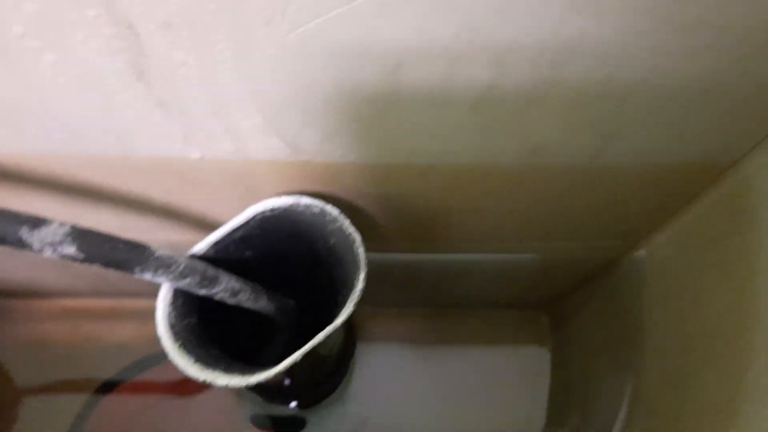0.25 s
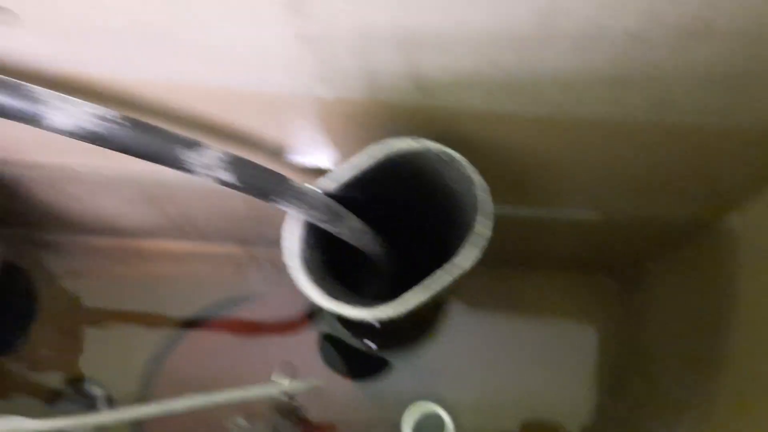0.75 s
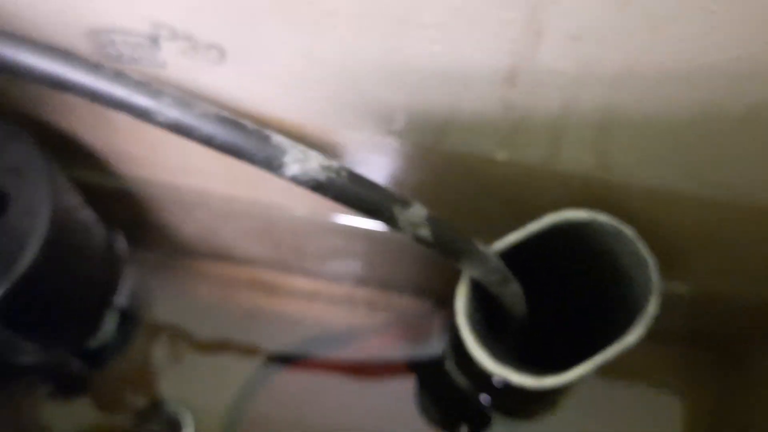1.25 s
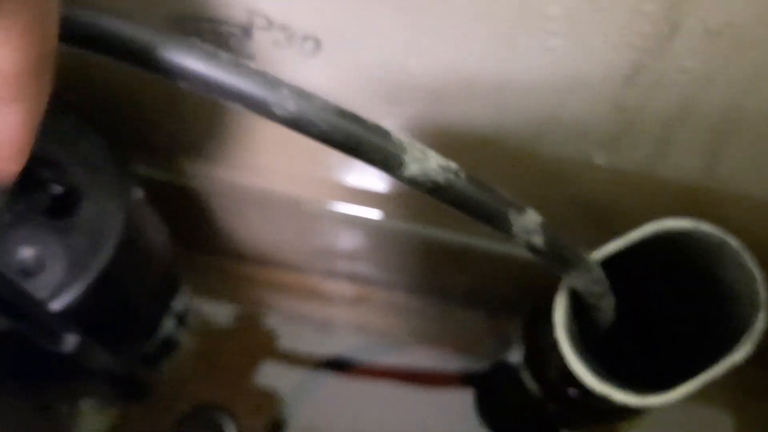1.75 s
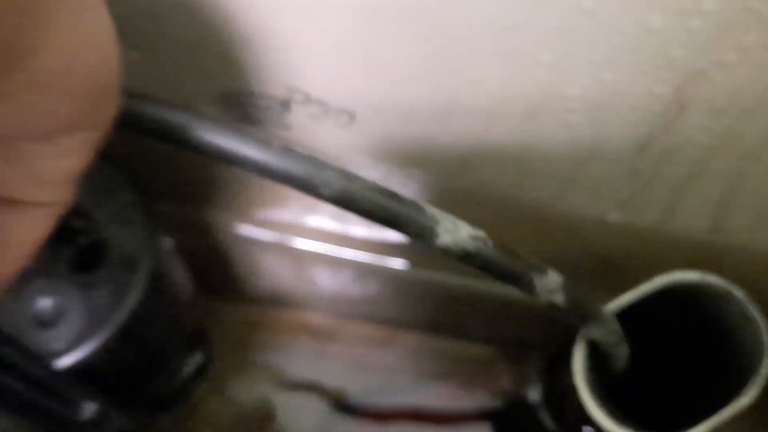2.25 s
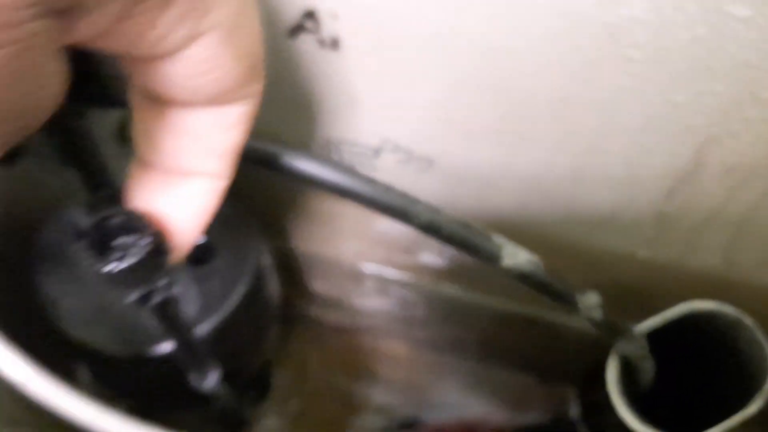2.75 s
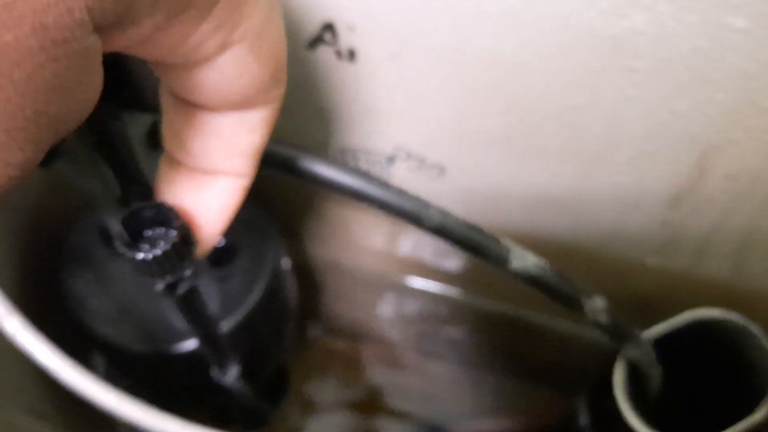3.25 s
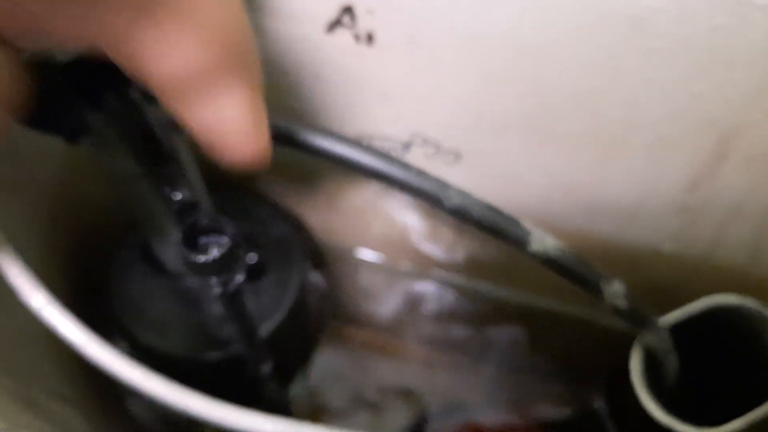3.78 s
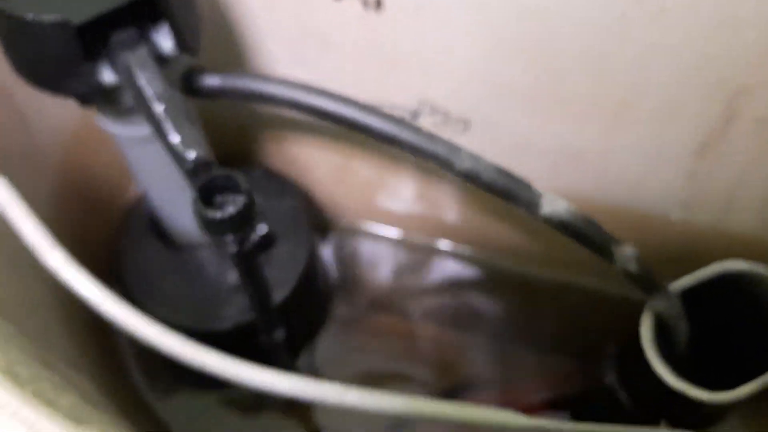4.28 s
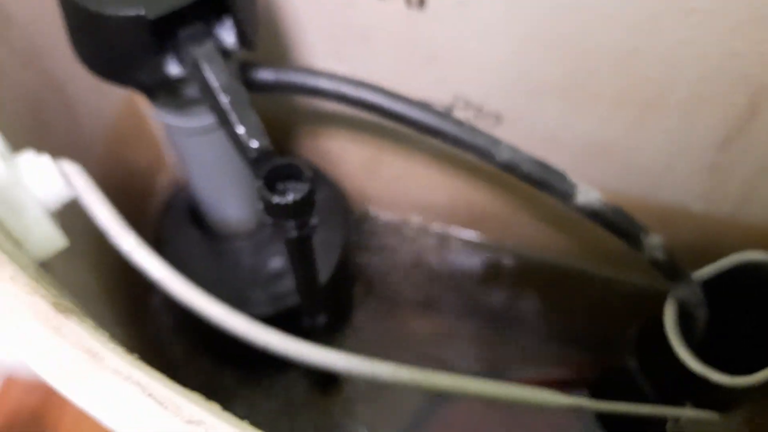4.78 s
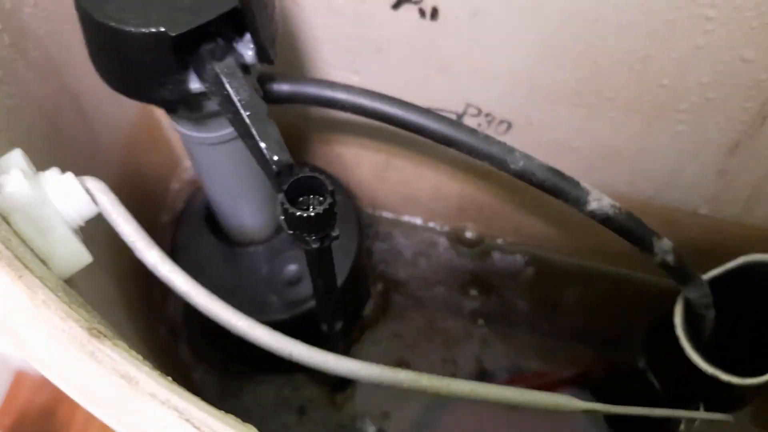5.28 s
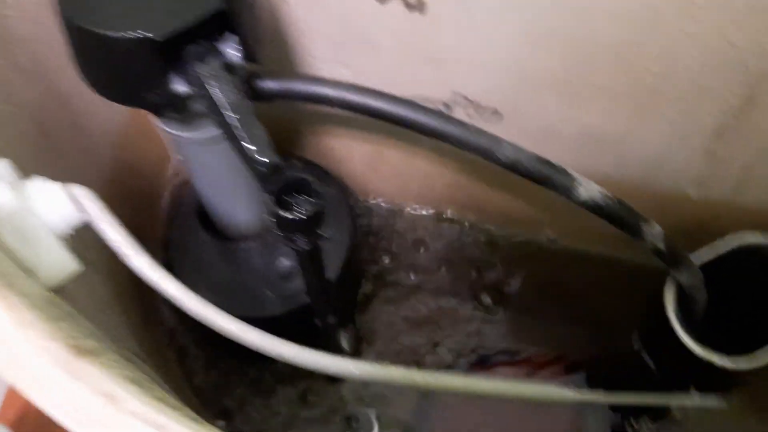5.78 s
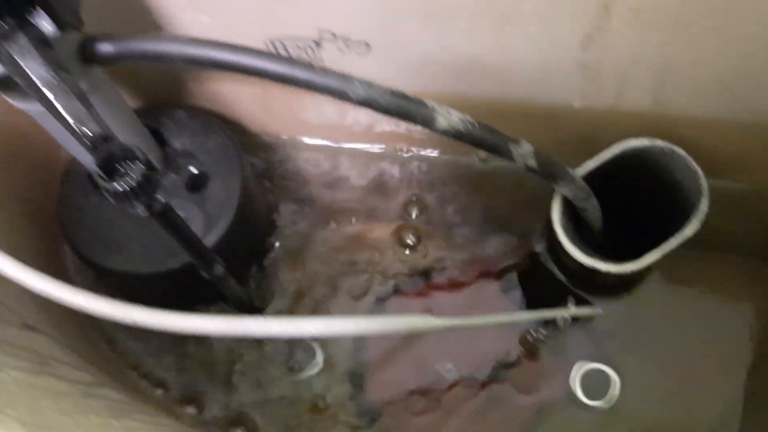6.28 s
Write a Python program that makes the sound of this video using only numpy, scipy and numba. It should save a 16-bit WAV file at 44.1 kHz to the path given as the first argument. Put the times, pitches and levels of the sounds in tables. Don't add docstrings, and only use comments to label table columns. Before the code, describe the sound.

Stereo phone microphones sit close over an open toilet tank in a small tiled bathroom. From 0 to 0.7 s, valve water hisses steadily over a hollow low gurgle and dull pipe rumble. At 0.7-0.95 s a finger snaps, rubs and bumps the left microphone, with two very loud thumps around 0.8 and 0.93 s that briefly duck the water. From 1 s the hiss is closer and brighter, with a small spit near 1.5 s. Around 2.3-2.8 s a breathy mid-high whistle sings as the valve is pinched; thuds, glugs and ticking drips follow. From 3 to 3.5 s it is almost quiet, with sparse drips and faint bubbles. At 3.56 s the valve spurts sharply as the float drops; it clunks hollowly at 3.8 s. Water rushes in from 3.9 s, churning with resonant bubbles, deepest and loudest glug near 5.05 s, then easing to steady bubbly hiss until 6.5 s.

```python
import sys
import numpy as np
from scipy import signal
from scipy.fft import rfft, irfft
from scipy.io import wavfile
from scipy.ndimage import uniform_filter1d, minimum_filter1d
from numba import njit

SR = 44100
rng = np.random.default_rng(int(sys.argv[2]) if len(sys.argv) > 2 else 0)


def int16_out(signal):
    q = np.round(np.clip(np.atleast_2d(signal).T, -1, 1) * 32767)
    wavfile.write(sys.argv[1], SR, q.astype(np.int16))


def natural_amplitude(level_db):
    exponent = np.asarray(level_db, float) / 20
    return 10 ** exponent


N = 287973


def table(rows):
    s, *columns = np.transpose(rows)
    return [np.interp(np.arange(N) / SR, s, c) for c in columns]


def unit(x):
    return x / np.sqrt(np.mean(x ** 2))


def colour(points, hz):
    point_hz, db = np.transpose(points)
    return np.interp(np.log(hz + 1), np.log(point_hz), db)


def ring(x, hz, width_hz):
    return signal.lfilter(*signal.iirpeak(hz, hz / width_hz, fs=SR), x)


def walk(rate):
    k = int(SR / rate)
    steps = np.repeat(rng.standard_normal(N // k + 1), k)
    return uniform_filter1d(uniform_filter1d(steps, k), k)[:N]


def fizz(rate, spread_db):
    size = np.minimum(rng.exponential(size=N), 3)
    clicks = (rng.random(N) < rate / SR) * natural_amplitude(spread_db * size)
    burst = signal.lfilter([1], [1, -np.exp(-1 / (0.0011 * SR))], clicks)
    return unit(rng.standard_normal((2, N)) * (1 + 0.25 * burst))


def add(out, s, sound):
    i = int(s * SR)
    out[..., i:i + sound.shape[-1]] += sound[..., :N - i]


def ping(db, hz, t60, rise=0.0084, glide=0.024):
    t = np.arange(int(min(.3, max(1.2 * t60, .1)) * SR)) / SR
    envelope = natural_amplitude(db - 60 * t / max(t60, .004)) * (1 - np.exp(-t / rise))
    return envelope * np.sin(2 * np.pi * hz * t * (1 + glide * t / (t + t60)))


def pings(rows, **shape):
    out = np.zeros((2, N))
    for s, db, hz, t60 in rows:
        add(out, s, ping(db, hz, t60, **shape))
    return out


def swell(s, attack_s, release_s):
    t = np.arange(N) / SR - s
    return np.exp(np.where(t < 0, t / attack_s, -t / release_s))


def tank(x, t60=0.15, echo_db=-21, alike=0.14):
    t = np.arange(int(.1 * SR)) / SR
    walls = rng.standard_normal((2, len(t))) * natural_amplitude(echo_db - 60 * t / t60)
    walls[0, 0] = walls[1, 18] = 1
    walls = walls / np.sqrt(np.sum(walls ** 2, axis=1, keepdims=True))
    heard = np.array([x[0], alike * x[0] + np.sqrt(1 - alike ** 2) * x[1]])
    return signal.fftconvolve(heard, walls, axes=1)[:, :N]


# (time [s], place [0 over the pipe, 1 over the float, 2 over open water])
PHONE_PLACE = [(0, 0), (.8, 0), (1.02, 1), (3.4, 1), (3.6, 2), (6.53, 2)]


def at_place(values):
    return np.interp(table(PHONE_PLACE)[0], np.arange(len(values)), values)


def pan(place_db):
    return natural_amplitude(at_place(place_db) * np.array([[.5], [-.5]]))


def over_water():
    return np.clip(table(PHONE_PLACE)[0] - 1, 0, 1)


def lean(db):
    return natural_amplitude(db * over_water() * np.array([[.5], [-.5]]))


# (time [s], stage [0 over the pipe, 1 over the float, 2 valve held, 3 refill])
WATER_STAGE = [(0, 0), (.8, 0), (1.02, 1), (2.8, 1), (2.95, 2), (3.9, 2), (4.25, 3), (6.53, 3)]


def at_stage(values):
    return np.interp(table(WATER_STAGE)[0], np.arange(len(values)), values)


USUAL_FLOW_DB, USUAL_CHURN_DB = -37, -38
# (time [s], valve flow level [dB], churn level in the tank [dB])
WATER_LEVELS = [(0, -41.5, -39.5), (.9, -41, -39.5), (1.0, -40, -45), (2.0, -39.5, -43), (2.5, -36, -36.5),
                (2.72, -36.5, -42), (2.87, -60, -35.5), (3.02, -65.5, -45), (3.5, -79, -66),
                (3.56, -60, -37), (3.6, -44.5, -43.5), (3.68, -45, -45), (3.8, -41, -37.5),
                (3.95, -31, -31), (4.35, -32.5, -32), (5.08, -34, -25.5), (5.43, -34.5, -35.5),
                (6.53, -35, -38)]
# (time [s], flow level [dB])
VALVE_GASPS = [
    (2.982, -58),
    (3.224, -68),
    (3.57, -27.5),
    (3.71, -48),
    (3.858, -44),
]


def water():
    flow_db, churn_db = table(WATER_LEVELS)
    gasps = sum(natural_amplitude(db) * swell(s, attack_s=0.0025, release_s=0.0024) for s, db in VALVE_GASPS)
    return 20 * np.log10(natural_amplitude(flow_db) + gasps), churn_db


def follows(place_db, per_flow, per_churn):
    flow_db, churn_db = water()
    flow_part = per_flow * (flow_db - USUAL_FLOW_DB)
    return natural_amplitude(at_place(place_db) + flow_part + per_churn * (churn_db - USUAL_CHURN_DB))


def modes(drive, rows, flicker_db):
    out = 0
    for hz, width_hz, *db in rows:
        mode = ring(ring(drive, hz, width_hz), hz, 4.7 * width_hz) / np.sqrt(width_hz)
        out = out + natural_amplitude(at_stage(db) + flicker_db * walk(14)) * mode
    return out


# (frequency [Hz], level [dB per Hz])
JET_OVER_PIPE = [(1410, -3), (2400, 1), (3120, 3.5), (4600, -15), (5390, -3.5), (7890, -4), (9550, -13.5),
                 (11800, -4), (13700, -3.5), (15500, 0), (16000, -13)]
# (frequency [Hz], level [dB per Hz])
JET_OVER_FLOAT = [(1410, -4), (2400, -2.5), (2520, -1.5), (3960, -0.5), (4280, -8.5), (5700, 0.5),
                  (6470, 3.5), (8150, 0), (8950, 6.5), (9300, -9.5), (10300, -0.5), (11800, 4.5),
                  (15600, 4.5), (16000, -19)]
# (frequency [Hz], level [dB per Hz])
JET_OVER_WATER = [(1410, -17), (2400, -8.5), (3600, -2), (4220, -7.5), (4570, -6), (7830, -4), (8890, -3.5),
                  (9780, -12), (12800, -0.5), (15600, -3), (16000, -11)]
# (frequency [Hz], left minus right [dB])
PORT_TREBLE = [(3000, 6), (8000, -2), (15000, -2.5)]


def jet(patchy_db=0.5, swell_db=0.5, streak_db=2.0):
    spray = tank(fizz(249.3, 5.65), echo_db=-35, alike=0.33)
    hz, s, z = signal.stft(spray, SR, nperseg=512)
    place = np.interp(s, *np.transpose(PHONE_PLACE))
    db = 0
    for k, points in enumerate((JET_OVER_PIPE, JET_OVER_FLOAT, JET_OVER_WATER)):
        db = db + np.outer(colour([(500, -46)] + points, hz), np.clip(1 - abs(place - k), 0, 1))

    flow_db = np.interp(s, *np.array(WATER_LEVELS)[:, :2].T)
    throttle_db = np.clip(USUAL_FLOW_DB - 9 - flow_db, 0, 25)
    pinch_db_per_octave = 0.55
    db = db - pinch_db_per_octave * np.outer(np.log2(1 + hz / 4000), throttle_db)
    power = np.mean(natural_amplitude(db) ** 2, axis=0)

    def blotches(bins, frames):
        rough = uniform_filter1d(rng.standard_normal(db.shape), size=bins, axis=0)
        return unit(uniform_filter1d(rough, size=frames, axis=1))

    patches, streaks = blotches(6, 6), blotches(2, 40)
    sway = 1 + .045 * np.interp(s, np.arange(N) / SR, walk(3.07))
    mirror_ms = np.interp(place, np.arange(3), (1.3, 1.505, 1.62))
    late_s = mirror_ms / 1000 * sway
    column = hz[:, None]
    mirror = .42 * np.exp(-(column / 8000) ** 2 - 2j * np.pi * np.outer(hz, late_s))
    z = z * natural_amplitude(streak_db * streaks * np.exp(-(column / 7000) ** 2)) * (1 + mirror)
    tilt_share = np.interp(place, np.arange(3), (2.2, 0.79, 0.88))
    tilt = natural_amplitude(np.outer([.5, -.5], colour(PORT_TREBLE, hz))[:, :, None] * tilt_share)
    z = z * tilt * natural_amplitude(db + patchy_db * patches) / np.sqrt(power)
    hiss = signal.istft(z, SR, nperseg=512)[1][:, :N]
    return unit(hiss) * natural_amplitude(swell_db * walk(22.45))


# (frequency [Hz], width [Hz], level over pipe, over float, valve held [dB])
AIR_MODES_HIGH = [(860, 19, -25, -8.5, -8), (988, 51, 1, -2.5, 3), (1260, 210, 4.5, 2, 8),
                  (1641, 59, 3, 7, 0), (1950, 63, 4, 1.5, -1), (2080, 82, 2.5, 4, -4),
                  (2244, 160, -20, -0.5, -19), (3054, 110, 1, -3, -16), (4020, 49, -4, -6.5, -22),
                  (4620, 98, -24, -9.5, -23), (5300, 120, -27, -21, -22)]
# (frequency [Hz], width [Hz], level [dB])
AIR_MODES_LOW = [(920, 6.7, 5.5), (987, 40, 7), (1200, 170, -3), (1232, 80, 1.5), (1340, 87, 10),
                 (1580, 250, 10.5), (1715, 73, 5.5), (1910, 150, 7), (2090, 62, 4), (2277, 570, -1.5)]


def splash(low, flicker_db=2.0, bed_db=-8):
    drive = tank(fizz(400, 3.5), echo_db=-34, alike=.35)
    bed = unit(ring(ring(drive, 1740, 3600), 2200, 5100))
    under = lean(2) * modes(drive, AIR_MODES_LOW[:5], flicker_db)
    over = lean(-7) * modes(drive, AIR_MODES_LOW[5:], flicker_db)
    full = unit(modes(drive, AIR_MODES_HIGH, flicker_db))
    bed_gain = natural_amplitude(bed_db + at_stage((0.5, -2, 4, -1.0)))
    return unit((1 - low) * full + low * unit(under + over) + bed_gain * bed)


# (frequency [Hz], width [Hz], level at the four stages [dB])
BELLY_MODES = [(243.8, 8.8, -9.5, -12.5, -16, -16.5), (277.7, 45, -1.5, -7.5, -8, -16.5),
               (310, 17.2, -7, -1.5, 0.5, -2.5), (339.5, 19.8, -5, -4, 0.5, 2),
               (355.3, 7.8, 1.5, -5.5, -10, -3.5), (365.6, 5.9, 1, 0, -14, -2)]


def gurgle(flicker_db=2.0, apart_db=-13):
    mid, side = fizz(110, 4.5)
    both = mid + natural_amplitude(apart_db) * side * np.array([[1], [-1]])
    out = 0
    for hz, width_hz, *db in BELLY_MODES:
        mode = ring(ring(both, hz, width_hz), hz, 3 * width_hz) / np.sqrt(width_hz)
        out = out + natural_amplitude(at_stage(db) + flicker_db * walk(21)) * mode
    return unit(out)


# (frequency [Hz], level [dB per Hz])
PIPE_RUMBLE = [(15, -51), (25, -21), (36, -65), (48, -1), (80, -9.5), (113, 1), (162, -9.5), (240, -9),
               (260, -4), (340, 3), (570, -120)]


def rumble(apart_db=-10):
    gain = natural_amplitude(colour(PIPE_RUMBLE, np.fft.rfftfreq(N, 1 / SR)))
    mid, side = irfft(rfft(rng.standard_normal((2, N))) * gain, N)
    return unit(mid + natural_amplitude(apart_db) * side * np.array([[1], [-1]]))


# (frequency [Hz], width [Hz], level at the four stages [dB])
CROSS_MODES = [(458.5, 8.3, 2.5, 2, 1, -3), (550.4, 48, -3.5, -6, -6, -0.5), (583, 148, 8, 8.5, 3.5, 10),
               (643, 27, 4.5, 3, 5, -0.5)]


def slosh():
    drive = tank(fizz(120, 0.81), echo_db=-30.5, alike=0.63)
    gain = follows((-42, -47.5, -45.5), per_flow=0.07, per_churn=0.45) * lean(-0.5)
    return gain * unit(modes(drive, CROSS_MODES, flicker_db=2.5))


# (frequency [Hz], level [dB per Hz])
ROOM_HUSH = [(260, -48), (450, 16), (802, -23), (1310, 5.5), (1470, -14), (3970, -28), (15500, -30)]


def room():
    gain = natural_amplitude(colour(ROOM_HUSH, np.fft.rfftfreq(N, 1 / SR)))
    return natural_amplitude(-61.5) * unit(irfft(rfft(rng.standard_normal((2, N))) * gain, N))


# (time [s], peak level [dB], frequency [Hz], t60 [s])
PLINK_EVENTS = [(0.113, -20.5, 664, 0.068), (3.144, -44, 1313, 0.11), (3.387, -46, 1340, 0.093),
                (3.59, -42, 975, .4), (3.2, -48, 985, 0.11), (2.33, -40, 833, 0.47), (3.8, -42, 633, 0.11),
                (2.6, -41, 580, .1), (3.245, -47, 450, 0.068), (3.338, -54, 370, .15),
                (3.81, -34, 540, 0.23), (4.1, -26.5, 688, 0.12), (3.773, -20.5, 1350, 0.042),
                (4.221, -22.0, 947, 0.13), (2.748, -29, 560, 0.096), (2.3, -32.0, 680, .08),
                (2.807, -27, 450, 0.085), (2.771, -26, 1100, 0.063), (2.84, -33, 653, 0.13),
                (2.77, -35.5, 993, 0.24), (3.566, -24, 966, 0.08)]


def plinks():
    return pings(PLINK_EVENTS)


# (time [s], level [dB], snap frequency [Hz], cavity frequency [Hz], cavity level [dB])
FINGER_TAPS = [(0.7088, -2.5, 2360, 503, -19), (.7465, -24, 900, 100, 11), (.7145, -14, 3200, 2400, -2),
               (.7515, -16, 1500, 600, -6), (.7992, -20, 1000, 880, 18), (.7994, -14, 1800, 1900, 5),
               (.7082, -22, 700, 1500, 8), (.7088, -20, 5500, 2200, 4), (.9335, -30, 500, 120, 19),
               (.876, -20, 3000, 396, -9), (.896, -30, 900, 230, 10), (0.9038, -15, 4500, 1300, -4),
               (0.9152, -7, 4300, 380, -4), (.9178, -12, 3000, 900, -6), (.9203, -16, 2200, 250, -1)]
# (time [s], level [dB], snap [Hz], cavity [Hz], cavity level [dB])
HARD_BUMPS = [
    (.7992, 9, 1000, 290, -3),
    (.9298, 13, 1350, 250, -9),
]
# (time [s], grit level [dB], pressure level [dB], release [s])
RUB_STROKES = [(0.713, -28, -26, 0.012), (.726, -34, -31, 0.031), (.75, -34.5, -29, 0.049),
               (.82, -37, -51, 0.048), (.895, -40, -38, .01), (.903, -44, -44, 0.0095),
               (0.919, -28, -21, 0.0028), (.938, -58, -18, 0.0087)]


def finger():
    out = np.zeros(N)
    t = np.arange(int(.3 * SR)) / SR
    for s, db, snap_hz, hz, cavity_db in FINGER_TAPS + HARD_BUMPS:
        t60 = (8.5 if db > 0 else 4.5) / hz
        decay_db = 20 if snap_hz < 4000 else 8
        snap = np.sin(2 * np.pi * snap_hz * t) * natural_amplitude(-decay_db * t * snap_hz)
        add(out, s, -1.6 * natural_amplitude(db) * snap)
        add(out, s + .5 / snap_hz, natural_amplitude(db) * ping(cavity_db, hz, t60, rise=0.000067, glide=0))
    grit = fizz(900, 4.0)[0]
    rub = unit(ring(ring(grit, 2100, 2600), 2300, 4000)) + natural_amplitude(-4.0) * unit(ring(grit, 300, 610))
    push = unit(ring(grit, 79, 62))
    for s, grit_db, pressure_db, release_s in RUB_STROKES:
        stroke = swell(s, min(0.005, release_s), release_s)
        out = out + stroke * (natural_amplitude(grit_db) * rub + natural_amplitude(pressure_db) * push)
    return signal.lfilter(*signal.butter(3, 6000, fs=SR), out)


# (time [s], peak level [dB])
AIR_PUFFS = [(1.476, -27), (2.841, -37), (2.8844, -40), (2.9243, -43), (2.9771, -44), (3.065, -44),
             (3.2256, -49), (3.255, -48), (3.3109, -55), (3.5234, -58), (3.567, -43), (3.604, -28),
             (3.631, -26)]


def spits():
    out, t = np.zeros((2, N)), np.arange(int(.1 * SR)) / SR
    for s, db in AIR_PUFFS:
        puff = np.diff(rng.standard_normal((2, len(t))), prepend=0)
        add(out, s, natural_amplitude(db + 3.5 - 60 * t / .022) * ring(puff, 5500, 7800))
    return tank(out, echo_db=-31.5)


# (time [s], peak level [dB], frequency [Hz],
# t60 [s])
GLUG_EVENTS = [(2.005, -24.5, 362, 0.074), (2.709, -28, 380, 0.091), (2.762, -20.5, 288, 0.074),
               (2.815, -22, 320, 0.056), (2.853, -17, 316, 0.042), (2.963, -31, 327, 0.12),
               (3.349, -24, 289, 0.075), (3.396, -27, 284, 0.06), (3.61, -28, 292, 0.074),
               (3.705, -29, 317, 0.13), (3.849, -29, 300, .09), (3.936, -27, 324, 0.078),
               (4.03, -19.5, 293, .12), (3.963, -13.5, 291, 0.094), (4.779, -12.5, 343, 0.097),
               (4.915, -21, 350, 0.1), (5.046, -2, 334, 0.041), (5.091, -8, 328, 0.083),
               (5.473, -18, 336, 0.11),
               (4.084, -24, 290, 0.18), (4.209, -19, 299, 0.092), (4.28, -16.5, 343, 0.11),
                 (4.378, -24, 354, .15), (4.462, -22, 363, 0.11), (4.525, -24, 315, .1),
                 (4.557, -29, 333, 0.089), (4.647, -25, 323, 0.09), (4.684, -18.5, 357, 0.23),
                 (4.887, -22, 357, 0.16), (4.949, -16, 354, 0.12), (5.017, -12.5, 343, 0.077),
                 (5.16, -23, 353, 0.22), (5.22, -20, 355, 0.15), (5.311, -17, 322, 0.09),
                 (5.436, -34, 334, 0.057), (5.529, -21.5, 346, 0.13), (5.665, -23, 344, .12),
                 (5.883, -24, 355, .1), (5.94, -17.5, 335, 0.092), (6.0, -22.5, 332, 0.16)]


def glugs():
    return pings(GLUG_EVENTS)


# (time [s], frequency [Hz], level [dB])
VALVE_WHISTLE = [
    (2.2, 1257, -61),
    (2.27, 1270, -44.5),
    (2.4, 1275, -39),
    (2.769, 1270, -42.5),
    (2.83, 1290, -47),
]


def whistle(width_hz=260):
    first, last = VALVE_WHISTLE[0], VALVE_WHISTLE[-1]
    start, end = (first[0] - .05, first[1], -90), (last[0] + 0.35, last[1], -70)
    hz, db = table([start] + VALVE_WHISTLE + [end])
    phase = 2 * np.pi * np.cumsum(hz) / SR
    band = [walk(width_hz) * np.sin(phase) + walk(width_hz) * np.cos(phase) for _ in range(2)]
    return natural_amplitude(db + 6.0) * np.array(band) * (np.arange(N) < 3.05 * SR)


# (time [s], peak level [dB], frequency [Hz], t60
# [s])
BUBBLE_BLIPS = [(2.62, -32, 2030, .15), (2.66, -25.5, 1954, 0.18), (3.7, -30, 2120, 0.086),
                (3.73, -31, 2050, 0.12), (3.775, -22, 1690, 0.074), (3.785, -28.5, 2117, 0.19),
                (3.83, -31, 2160, 0.27), (3.875, -24, 2045, 0.094), (3.875, -32, 1370, 0.092),
                (3.945, -20.5, 2150, 0.12), (3.982, -17.5, 1976, 0.097), (3.99, -22.5, 2060, 0.13),
                (4.05, -20, 2090, 0.099), (4.05, -31, 1320, 0.11), (4.51, -27, 2050, .15),
                (4.56, -25, 1276, 0.22), (4.63, -19, 1270, 0.24), (4.756, -21, 1713, 0.15),
                (4.79, -24.5, 944, 0.18), (4.89, -34, 2080, 0.25), (4.93, -31, 1010, 0.22),
                (5.0, -16, 1260, 0.16), (5.1, -24, 1724, 0.12), (5.105, -30, 2010, .12),
                (5.12, -25, 1000, 0.47), (5.17, -22.5, 917, 0.32), (5.2, -22, 1340, .15),
                (5.315, -17.5, 1714, 0.11), (5.345, -19, 1240, 0.17), (5.36, -22, 1730, 0.098),
                (5.51, -29, 1720, 0.33), (5.56, -30, 2145, 0.1), (5.66, -29, 980, 0.46),
              (5.835, -22, 2090, 0.076), (5.86, -24, 1710, 0.17), (5.945, -22, 1370, .12),
              (5.95, -24.5, 1780, 0.16), (6.014, -24.5, 1720, 0.11), (6.115, -26, 1780, .1),
              (6.2, -22.5, 1755, 0.15), (6.2, -28, 1210, .1), (6.295, -24, 1760, 0.14),
              (6.4, -30, 1350, .2)]


def blips():
    return natural_amplitude(-3.0) * tank(pings(BUBBLE_BLIPS, rise=0.0032, glide=0.019), echo_db=-31.5)


# (time [s], peak level [dB], frequency [Hz], t60 [s])
DULL_THUDS = [(2.705, -25, 111, .1), (2.743, -18, 101, 0.1), (2.799, -17, 114, 0.07),
              (2.845, -27, 74.6, 0.13), (2.879, -21.5, 114, 0.085), (2.93, -23, 103, 0.08),
              (2.76, -34.5, 210, 0.3), (3.928, -29.5, 202, 0.17), (4.428, -12, 137, 0.032)]


def thuds():
    return pings(DULL_THUDS)


# (time [s], peak level [dB], frequency [Hz])
WATER_DRIPS = [(2.7452, -20, 5130), (2.745, -23.5, 1590), (2.7661, -19, 7700), (2.768, -27, 6200),
               (2.8005, -29, 2710), (2.8236, -24.5, 6200), (2.8404, -32, 5120), (2.8699, -36, 2220),
               (2.8743, -17.5, 8620), (2.9265, -30.5, 2530), (2.927, -31, 3720), (2.945, -38, 2140),
               (2.9662, -41, 2160), (2.966, -34, 5400), (3.0155, -34, 5500), (3.065, -46, 2170),
               (3.1108, -40, 2560), (3.112, -46, 2150), (3.112, -39, 6850), (3.113, -38, 6200),
               (3.147, -42, 6300), (3.1447, -32, 2680), (3.146, -33, 2090), (3.146, -38, 1950),
               (3.146, -43, 1780), (3.146, -46, 3730), (3.2546, -53, 2940), (3.2789, -52, 2040),
               (3.3104, -58, 2050), (3.5259, -34, 7640), (3.527, -47, 3600), (3.5575, -25, 2160),
               (3.5648, -12, 5760), (3.5681, -19, 3470), (3.577, -21.5, 2030), (3.7035, -27, 4600),
               (4.144, -18, 3600)]


def drips():
    out, t = np.zeros((2, N)), np.arange(int(.1 * SR)) / SR
    for s, db, hz in WATER_DRIPS:
        t60 = .12 * (2500 / hz) ** 1.6
        puff = rng.standard_normal((2, len(t)))
        crackle = natural_amplitude(-60 * t / t60) * unit(ring(ring(puff, hz, .06 * hz), hz, .2 * hz))
        plip = ping(db - 11.5, hz, t60, rise=0.00066, glide=0.016)[:len(t)]
        add(out, s, natural_amplitude(db - 12.0) * crackle + plip)
    return tank(out, echo_db=-31.5)


# (time [s], peak level [dB], ring length [ratio], overtones [dB])
FLOAT_BLOWS = [
    (3.5622, -19.5, 1.6, -14),
    (3.7952, -10.5, .9, 0),
]
# (frequency [Hz], level [dB], t60 [s])
FLOAT_MODES = [(313, 0, .055), (452, -15, .36), (646, -21, .3), (712, -22, .2), (968, -36, .14)]


def clunks():
    out = np.zeros(N)
    for s, db, ring_share, over_db in FLOAT_BLOWS:
        for hz, mode_db, t60 in FLOAT_MODES:
            peak_db = db + mode_db + over_db * (mode_db < 0)
            add(out, s, -ping(peak_db, hz, t60 * ring_share, rise=.0018, glide=0))
    return signal.lfilter(*signal.butter(3, 230, "high", fs=SR), out)


# (time [s], level [dB], frequency [Hz], length [s])
SPRAY_SPURTS = [(3.602, -44, 8400, .04), (3.603, -42, 11800, 0.027), (3.605, -43, 15200, .03),
                (3.602, -46, 13000, .025), (3.605, -46, 6500, 0.045), (3.692, -50, 11700, 0.073),
                (3.845, -36, 4640, 0.012), (3.846, -46, 6500, .012), (3.905, -35, 4160, 0.025),
                (3.906, -38, 5140, .014)]


def spurts(width=0.087):
    out, t = np.zeros((2, N)), np.arange(int(.1 * SR)) / SR
    for s, db, hz, length_s in SPRAY_SPURTS:
        puff = rng.standard_normal((2, len(t)))
        shape = np.sin(np.pi * np.clip(t / length_s, 0, 1) ** 0.7)
        band = unit(ring(ring(puff, hz, width * hz), hz, 2 * width * hz))
        add(out, s, natural_amplitude(db + 7) * shape * band)
    return out


def bubbles(count=600, low_hz=880, octaves=1.7, t60=0.07, spread_db=3.0):
    out = np.zeros((2, N))
    for when, size, loud, side in rng.random((count, 4)):
        glint = ping(-spread_db * np.log(1 - loud), low_hz * 2 ** (octaves * size), t60, 0.0018, 0.11)
        add(out, 3.93 + when * 2.6, glint * np.array([[side], [1 - side]]))
    return unit(out)


def scene():
    flow_db, churn_db = water()
    out = pan((-9, 0.8, -0.7)) * natural_amplitude(flow_db + 5.0) * jet()
    small = natural_amplitude(2.0) * splash(over_water()) + natural_amplitude(-11.5) * bubbles()
    out = out + pan((-2, -2, -0.5)) * follows((-39, -39, -40), per_flow=.5, per_churn=0.53) * small
    gurgle_db = churn_db + at_stage((-2.0, -0.5, -0.9, -3)) + 1 * walk(14)
    out = out + pan((7, -1, -0.2)) * natural_amplitude(gurgle_db) * gurgle()
    out = out + natural_amplitude(9.0) * follows((-50.5, -54, -51.5), per_flow=0.02, per_churn=0.14) * rumble()
    out = out + slosh() + room() + plinks() + spits() + glugs() + whistle()
    out = out + blips() + thuds() + drips() + clunks() + spurts()
    return out + finger() * np.array([[1], [0]])


@njit
def recover(gain, release):
    out, g = np.empty(len(gain)), 1.
    for i in range(len(gain)):
        g = min(gain[i], g + (1 - g) * release)
        out[i] = g
    return out


def band_limit(x):
    return signal.sosfilt(signal.butter(12, 16990, fs=SR, output="sos"), x)


def record(dry):
    ahead, hold = int(.003 * SR), int(.008 * SR)
    need = np.minimum(1, .97 / (np.max(abs(dry), axis=0) + 1e-9))
    held = minimum_filter1d(need, size=ahead + hold, origin=(hold - ahead) // 2)
    gain = uniform_filter1d(recover(held, 1 / (0.034 * SR)), size=ahead // 2)
    low_pass = signal.ellip(10, .2, 60, 15850, fs=SR, output="sos")
    return band_limit(signal.sosfilt(low_pass, dry * gain))


dry = scene()
out = record(dry)
int16_out(out)
```